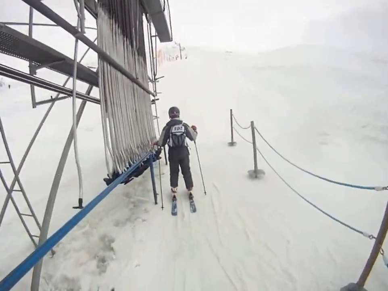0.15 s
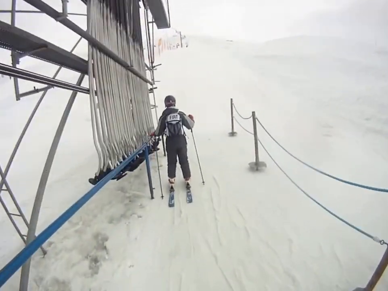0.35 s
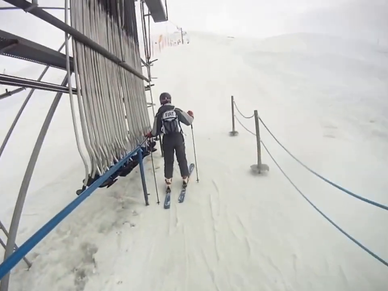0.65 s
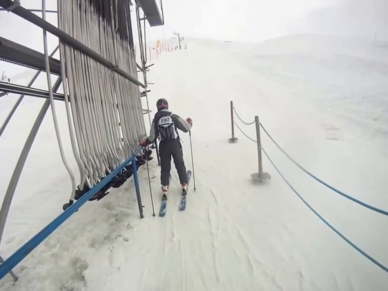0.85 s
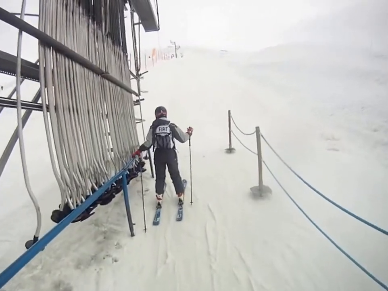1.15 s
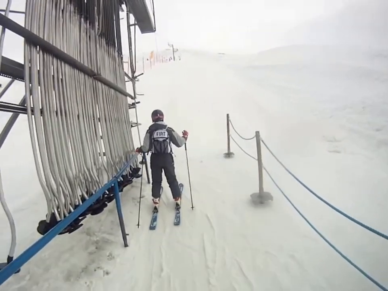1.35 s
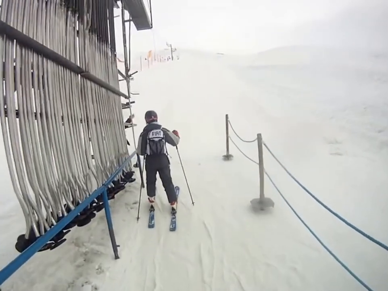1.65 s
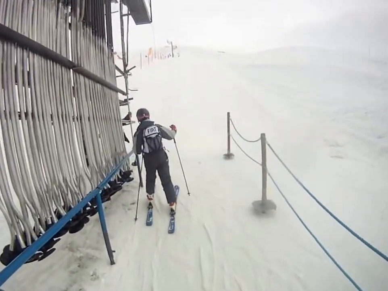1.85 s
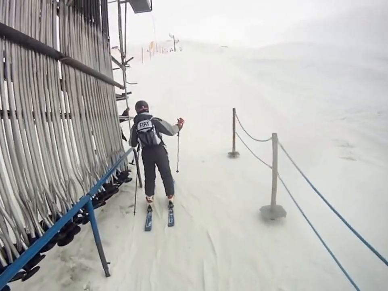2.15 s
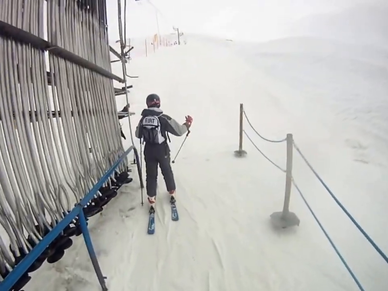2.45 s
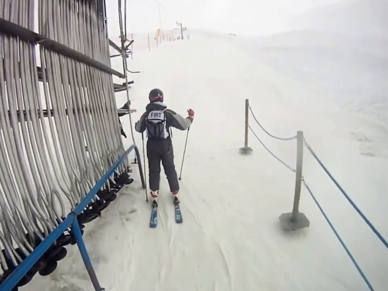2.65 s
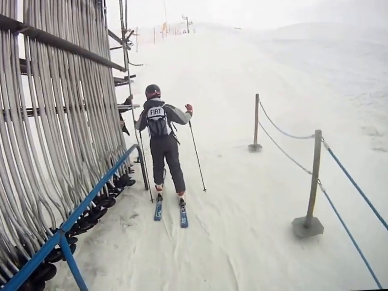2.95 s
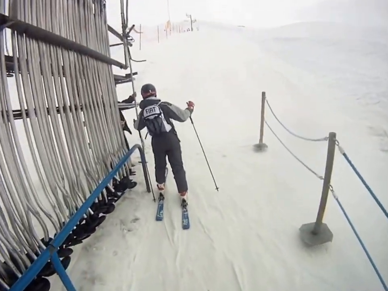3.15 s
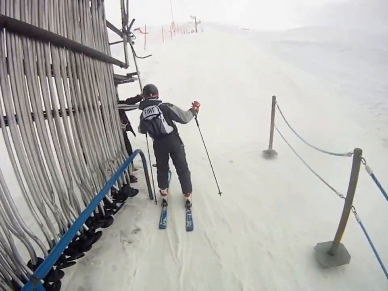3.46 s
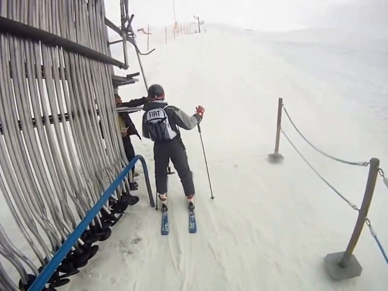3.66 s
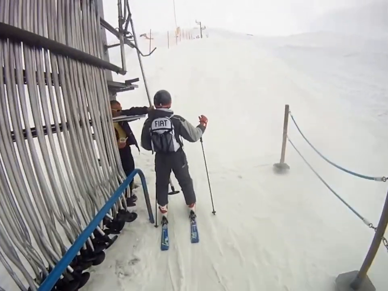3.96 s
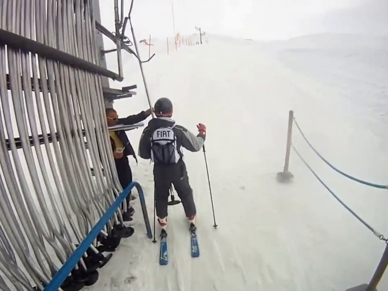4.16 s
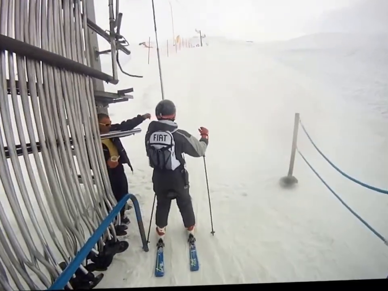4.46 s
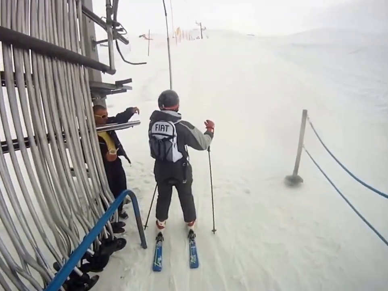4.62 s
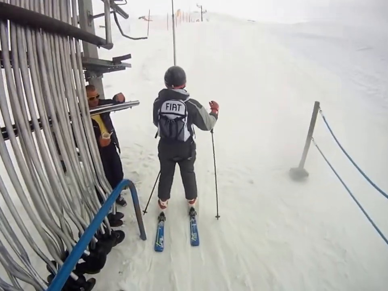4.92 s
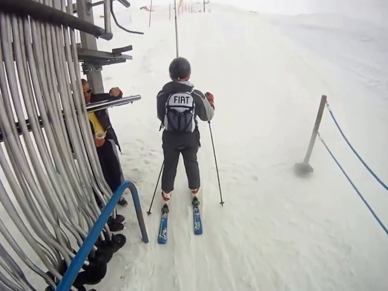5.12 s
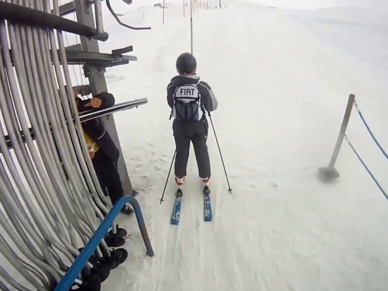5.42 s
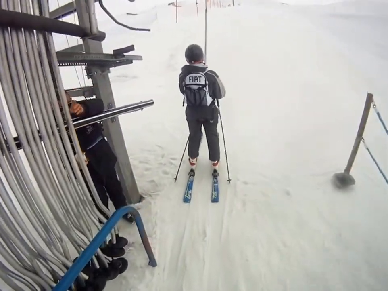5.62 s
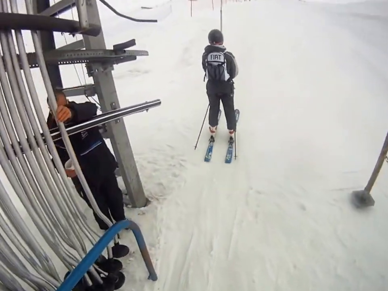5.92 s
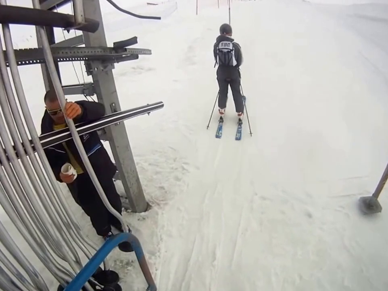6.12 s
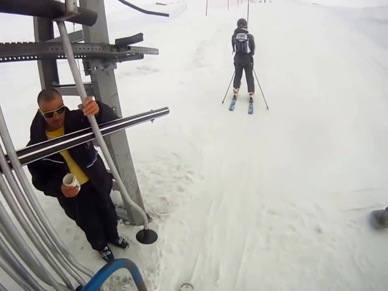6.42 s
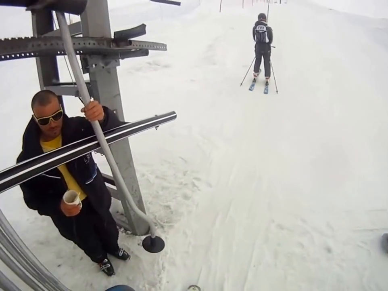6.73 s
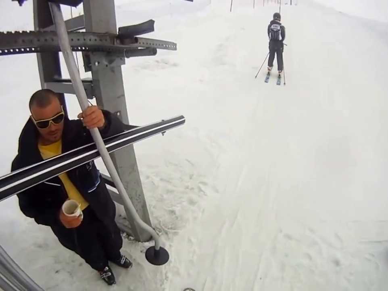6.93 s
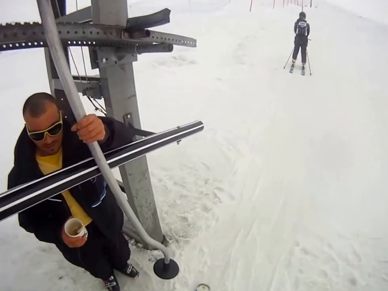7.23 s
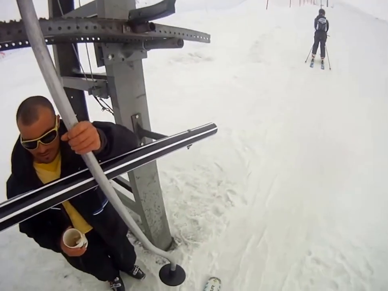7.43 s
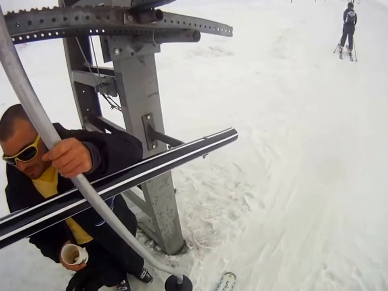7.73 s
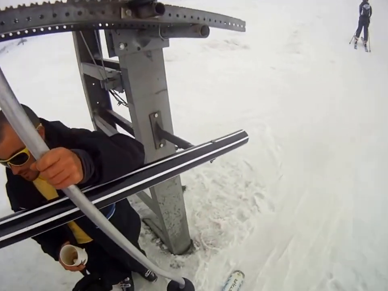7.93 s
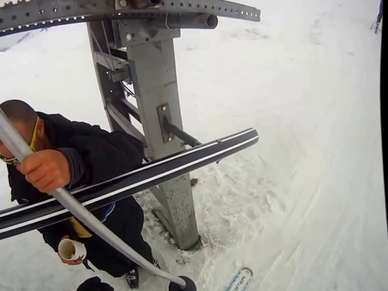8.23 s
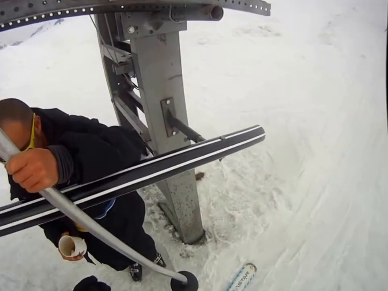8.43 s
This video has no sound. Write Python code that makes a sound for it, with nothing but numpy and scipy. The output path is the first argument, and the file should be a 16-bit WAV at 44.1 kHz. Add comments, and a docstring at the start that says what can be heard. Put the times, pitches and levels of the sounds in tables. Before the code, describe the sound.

Steady gearbox hum and motor rumble of a surface lift, cable whirring, metal poles clacking and scraping, with wind buffeting a sealed microphone.

```python
"""Drag lift drive station

A small microphone in a sealed case glides past the pole rack and hears steady tones from a gearbox.
Filtered noise makes the motor rumble and the wind; noise and clicks make the cable whirr over the sheaves.
Metal poles clack, slide and squeak: noise bursts ring the case, and gliding sines make the squeaks.
One knock hits the case itself. A low sample rate with held values adds mirror images of the spectrum."""
import sys
import numpy as np
from scipy import signal
from scipy.fft import rfft, irfft, next_fast_len
from scipy.io import wavfile

SR = 44100
rng = np.random.default_rng(int(sys.argv[2]) if len(sys.argv) > 2 else 0)


def generate_wav(signal):
    """Clip the signal to [-1, 1] and save it as 16-bit WAV at the path in sys.argv[1]."""
    frames = np.transpose(np.atleast_2d(signal))
    scaled = np.clip(frames, -1, 1) * 32767
    pcm = np.round(scaled).astype(np.int16)
    wavfile.write(sys.argv[1], SR, pcm)


N = 378378   # length [samples]


def from_db(db):
    """Turn decibels into a gain."""
    return 10 ** (np.asarray(db) / 20)


def rms_one(x):
    """Scale a sound to an rms of 1."""
    return x / np.sqrt(np.mean(x ** 2) + 1e-20)


def in_time(rows):
    """Draw straight lines between the rows of a curve, giving each column at every sample."""
    s, *columns = np.transpose(rows)
    return [np.interp(np.arange(N) / SR, s, c) for c in columns]


def drift(rate_hz):
    """Slow random wandering with rms 1: noise smoothed by two equal low-passes, at every 40th sample."""
    r = np.exp(-2 * np.pi * rate_hz * 40 / SR)
    noise = rng.standard_normal(N // 40 + 2002)
    slow = signal.lfilter([1], [1, -2 * r, r * r], noise)[2000:]   # skip the filter's start
    return np.interp(np.arange(N) / 40, np.arange(len(slow)), rms_one(slow))


def coloured(points):
    """Noise with the given spectrum, scaled to an rms of 1."""
    size = next_fast_len(N)
    hz, level_db = np.transpose(points)
    grid = np.maximum(np.arange(size // 2 + 1) * SR / size, 1)
    shape = from_db(np.interp(np.log(grid), np.log(hz), level_db, left=-90, right=-90))
    spectrum = rfft(rng.standard_normal(size)) * shape
    return rms_one(irfft(spectrum, size)[:N])


def resonate(x, modes):
    """Resonances side by side, each applied twice; white noise of rms 1 comes out near rms 1."""
    out, power = 0, 0
    for k, (hz, width, level_db) in enumerate(modes):
        r = np.exp(-np.pi * width / SR)
        b = (1 - r * r) / 2 * np.array([1, 0, -1])
        a = [1, -2 * r * np.cos(2 * np.pi * hz / SR), r * r]
        ring = signal.lfilter(b, a, signal.lfilter(b, a, x))
        out = out + (-1) ** k * from_db(level_db) * ring   # signs alternate, for dark valleys between
        power += from_db(2 * level_db) * np.pi * width / (2 * SR)
    return out / np.sqrt(power)


# loudness of the motor and frame rumble: (time [s], level [dB])
RUMBLE = [(0, -39.5), (.3, -44.5), (1.5, -47.5), (3.5, -48), (5.3, -47), (6.4, -41.5), (7.3, -43.5),
          (7.8, -47.5), (8.58, -46)]
# tone colour of the rumble: (frequency [Hz], relative level per Hz [dB])
FRAME = [(40, -61), (100, 4.5), (130, 3.5), (170, -9), (250, -0.5), (330, 3.5), (380, -8), (550, -15.5),
         (640, -10), (810, -22), (950, -2.5), (1200, -46)]


def rumble():
    """Broad drone of motor and steel frame: coloured noise with a slightly unsteady level."""
    level_db = in_time(RUMBLE)[0] + 0.61 * drift(5.1)
    return from_db(level_db) * coloured(FRAME)


# wind buffeting the case, in gusts with a sheltered lull: (time [s], level [dB])
WIND = [(0, -42.5), (.85, -48), (.95, -37), (1.5, -44), (1.8, -49.5), (2.1, -46), (2.3, -38.5),
        (2.49, -34.5), (2.56, -46), (2.85, -41.5), (3.05, -48), (3.4, -48), (3.5, -37), (4.1, -43.5),
        (4.22, -36.5), (4.5, -49), (4.6, -43.5), (5.2, -44), (5.3, -55), (5.55, -59), (6.6, -63),
        (7.2, -55), (7.5, -54), (7.65, -41), (7.78, -46), (7.9, -37), (8.1, -38), (8.22, -48),
        (8.41, -35.5), (8.58, -47)]
# tone colour of the buffeting: (frequency [Hz], relative level per Hz [dB])
BUFFET = [(8.8, -30), (15, 2.5), (65, 6.5), (129, -2), (193, -12.5), (210, -12), (225, -23), (260, -57),
          (340, -55), (570, -120)]
LUMPS_DB, LUMPS_HZ = 2, 10   # size and speed of the uneven level


def wind():
    """Lumpy low pressure swings on the case: low noise with an uneven level."""
    level_db = in_time(WIND)[0] + LUMPS_DB * drift(LUMPS_HZ)
    return from_db(level_db) * coloured(BUFFET)


SHAFT_HZ = 22.687
# The moving listener passes through loud and dead spots of the gear tones.
# meeting gear teeth, 14 per turn of the shaft: (time [s], level [dB])
MESH = [(0, -38.5), (.7, -41.5), (1.05, -45), (1.28, -59), (1.6, -46.5), (2.15, -43.5), (2.4, -57),
        (2.65, -42), (3.2, -40), (3.9, -47.5), (4.5, -38), (4.95, -43), (5.45, -36), (6.15, -40),
        (6.5, -36), (7.1, -42), (7.6, -37.5), (8.58, -37)]
# tone one shaft turn below the mesh: (time [s], level [dB])
BELOW_MESH = [(0, -54), (.5, -73), (.8, -51), (1.1, -61), (2, -45), (2.6, -61), (3.5, -49), (4.5, -51),
              (4.8, -44), (6, -43), (6.2, -45), (6.4, -50), (8, -54), (8.58, -71)]
# tone at twice the mesh: (time [s], level [dB])
OCTAVE = [(0, -45), (2.6, -50), (3.45, -54.5), (3.75, -59), (4, -53), (4.35, -67), (4.8, -57), (5.1, -65),
          (5.7, -50), (6, -54.5), (6.35, -50.5), (6.8, -55.5), (7.25, -47.5), (7.8, -54.5), (8.58, -50)]
# tone at three times the mesh: (time [s], level [dB])
THIRD = [(0, -62), (.7, -52), (1.05, -70), (1.3, -56), (1.75, -59), (2.15, -49.5), (2.55, -67), (3.15, -52),
         (3.45, -63), (3.75, -55), (4.1, -60), (5.2, -55), (5.45, -48.5), (5.8, -62), (6.1, -48),
         (6.45, -57), (7.6, -55.5), (8.58, -49.5)]
# pitches of these four tones, in the same order: (multiple of shaft speed)
MESH_ORDERS = (14, 13, 28, 42)
# faint tones that come and go by chance: (multiple of shaft speed, mean level [dB], swing [dB])
FAINT_TONES = [(12, -65, 5), (15, -61, 7.5), (27, -66, 6.5)]
# tone of a second wheel: (time [s], level [dB])
SECOND_WHEEL = [(0, -53), (2.4, -66), (2.7, -59), (3.6, -46.5), (7.3, -47), (7.7, -51), (8.58, -50)]
SECOND_WHEEL_HZ, SECOND_WHEEL_WANDER = 222.6, 0.39   # wander of the phase [radians]
# looser tones of the frame:
# (frequency [Hz], phase wander [radians], start level [dB], end level [dB], swing [dB])
FRAME_TONES = [(171.5, 2.6, -51.5, -60, 3.5), (124.6, 2.9, -56, -48.5, 4.5)]


def gearbox():
    """Clean sines locked to the turning shaft, plus looser ones; all waver in level and phase."""
    turn = 2 * np.pi * np.arange(N) / SR   # phase of a 1 Hz tone
    shaft = SHAFT_HZ * turn + 0.044 * drift(0.94)
    mesh_curves = (MESH, BELOW_MESH, OCTAVE, THIRD)
    tones = [(k, in_time(rows)[0]) for k, rows in zip(MESH_ORDERS, mesh_curves)]
    tones += [(k, mean_db + swing_db * drift(0.99)) for k, mean_db, swing_db in FAINT_TONES]
    out = np.zeros(N)
    for k, level_db in tones:
        out += from_db(level_db + 0.86 * drift(3.6)) * np.sin(k * shaft)
    wheel = np.sin(SECOND_WHEEL_HZ * turn + SECOND_WHEEL_WANDER * drift(3.8))
    out += from_db(in_time(SECOND_WHEEL)[0] + 1.2 * drift(11)) * wheel
    for hz, wander, start_db, end_db, swing_db in FRAME_TONES:
        level_db = np.linspace(start_db, end_db, N) + swing_db * drift(3.4)
        out += from_db(level_db) * np.sin(hz * turn + wander * drift(3.93))
    return np.sqrt(2) * out   # the levels are rms values


# one knock on the case itself: (time [s], level [dB])
KNOCK = (7.869, -2)
# ring of the knocked shell: (frequency [Hz], level before the soft onset [dB], time to fall 60 dB [s])
KNOCK_MODES = [(528, -21.5, 0.052), (798, -9.5, 0.047), (1211.4, -2, 0.024), (1433, -5, 0.026),
               (1690, -5, 0.02), (2020, 0.5, 0.015), (2430, -5.5, 0.013), (3480, -16, 0.016)]


def knock():
    """A short soft contact rings the shell: a handful of sines that start together and die quickly."""
    after, out = np.arange(SR // 10) / SR, np.zeros(N)
    ring = np.zeros(len(after))
    for hz, level_db, t60 in KNOCK_MODES:
        ring += from_db(level_db - 60 * after / t60) * np.sin(2 * np.pi * hz * after)
    soft_onset = 1 - np.exp(-after / 0.003)
    at = round(KNOCK[0] * SR)
    out[at:at + len(after)] = from_db(KNOCK[1]) * ring * soft_onset
    return out


# metal squeaks as a pole rubs:
# (start [s], end [s], start pitch [Hz], end pitch [Hz], level [dB], roughness [dB])
SQUEAKS = [(0.24, 0.312, 4500, 4730, -45, 3), (0.43, 0.508, 4570, 4580, -27, -2),
           (0.503, 0.53, 4360, 4350, -32, -2), (6.606, 6.644, 5030, 4900, -48, 9.5),
           (6.637, 6.748, 4930, 4800, -43, 3.5)]
SQUEAK_WOBBLE = .3   # phase wobble [radians per dB of roughness]


def squeaks():
    """Gliding tones whose level and phase flutter with the grip."""
    out, flutter, wobble = np.zeros(N), drift(70), drift(140)
    for start, end, start_hz, end_hz, level_db, rough_db in SQUEAKS:
        at = np.arange(round(start * SR), round(end * SR))
        phase = 2 * np.pi * np.cumsum(np.linspace(start_hz, end_hz, len(at))) / SR
        phase += SQUEAK_WOBBLE * rough_db * wobble[at]
        fade = signal.windows.tukey(len(at), .4)
        out[at] += from_db(level_db + rough_db * flutter[at]) * fade * np.sin(phase)
    return out


def zone_gains(level_db, *zone_db):
    """Strength of a contact in the body zone, then in the other zones in dB against it."""
    return from_db(level_db + np.array([0, *zone_db])[:, None])


# cable whirr in the body zone as the listener glides along the rack: (time [s], level [dB])
WHIRR = [(0, -41), (.3, -45), (.75, -45), (1.3, -48.5), (2.05, -51.5), (2.5, -46.5), (3.1, -50.5),
         (3.5, -50), (3.75, -47), (4.2, -46.5), (4.4, -49.5), (5, -49.5), (5.5, -45.5), (5.9, -47.5),
         (6.5, -45), (7.3, -48), (8.58, -48.5)]
# whirr in the low body, upper ring and jingle zones: (mean level [dB], share of the body's swing in dB)
WHIRR_ZONES = [(-49.5, 0.85), (-58, 0.86), (-57, 0.82)]
GRAINS_PER_S, CLATTER_SHARE = 900, 0.17   # clicks per second, and their share of the power


def whirr():
    """Cable running over the sheaves: steady hiss mixed with random clicks, set for each of four zones."""
    body_db, = in_time(WHIRR)
    swing_db = body_db - body_db.mean()
    levels_db = [body_db] + [mean_db + share * swing_db for mean_db, share in WHIRR_ZONES]
    sizes = from_db(4.0 * np.minimum(rng.exponential(1, N), 5)) * rng.choice([-1, 1], N)
    grains = rms_one(sizes * (rng.random(N) < GRAINS_PER_S / SR))
    hiss = rng.standard_normal(N)
    mix = np.sqrt(1 - CLATTER_SHARE) * hiss + np.sqrt(CLATTER_SHARE) * grains
    return mix * from_db(levels_db)


# poles sliding along the rail: (start [s], loudest [s], end [s], body level [dB],
# low body against the body [dB], jingle against the body [dB])
SLIDES = [(0.348, 0.475, 0.71, -41, 4.5, 3), (2.196, 2.23, 2.3, -48, 0, -6),
          (3.854, 3.963, 4.15, -46.5, -3, -3), (5.096, 5.162, 5.23, -44, 4.5, -12),
          (5.16, 5.295, 5.36, -33.5, -2, -22), (5.283, 5.364, 5.55, -44, 1.5, -10),
          (6.03, 6.114, 6.2, -35, -6.5, -11), (6.095, 6.194, 6.4, -33, -5.5, -17.5),
          (6.533, 6.63, 6.76, -42.5, -9, -16), (6.744, 6.887, 7.22, -41, -3.5, -20),
          (7.424, 7.503, 7.74, -34.5, -5, -9)]
# upper ring in a slide: level against the body [dB], plus this share of the jingle's dB
UPPER_DB, UPPER_FOLLOWS = -5.5, 0.56


def slides():
    """Poles scraping along the rail: noise, roughened by stick and slip, swells and fades in four zones."""
    drive = np.zeros((4, N))   # body, low body, upper ring, jingle
    scrape = rng.standard_normal(N) * from_db(1.84 * drift(60))
    for start, loudest, end, body_db, low_db, jingle_db in SLIDES:
        swell = np.interp(np.arange(N) / SR, [start, loudest, end], [0, 1, 0])
        upper_db = UPPER_DB + UPPER_FOLLOWS * jingle_db
        drive += zone_gains(body_db, low_db, upper_db, jingle_db) * swell * scrape
    return drive


# pole blows: (time [s], peak of the crack in the body zone [dB], then against the body: thud [dB],
# low body [dB], upper ring [dB], jingle [dB]; last the chatter's drive, before its envelope [dB])
CLACKS = [(.216, -31.5, -15, -8, -5, -5.5, -12), (.2547, -26.5, -14, -6.5, -10, -4, -11.5),
          (.3428, -18.5, -16, -11, -8.5, -1.5, -12), (.4067, -25.5, -30, -24, -9, 7, -21),
          (.4193, -7.5, -30, -22, 0.5, -2, -26), (.4236, -14.5, -37, -1.5, -2.5, 2.5, -7.5),
          (.4485, -22, -20, 4.5, -8, 7, -7), (.4632, -21, -20, 7, -9, -3, -22),
          (.4889, -17, -20, -2.5, -1.5, 3.5, -10), (.5064, -22, -25, -1, -14, -2, -14.5),
          (.6329, -39, -10, 8.5, -6, 4, -11.5), (1.3285, -36.5, -7, -7, -5.5, -8, -20),
          (2.1934, -15.5, -38, -13, -7.5, -8, -15.5), (2.223, -30, -12, 5.5, -4, 3, -16),
          (2.5401, -40, -20, -19, -11, -10, -6), (3.8503, -25, -14, -7.5, -3, -1.5, -12.5),
          (3.9008, -31, -7, -5, -6, -3, -14), (4.1238, -34.5, -13, -12, -25, -10, -8),
          (4.1984, -40, -26, -17, -18, 1, -11), (4.3494, -47.5, -18, -8, -2, 8.5, -10),
          (4.5994, -48, -10, -4, 2, 2, -18), (5.2773, -33, -28, -15, -37, -29, -5),
          (5.2956, -33, -14, -1, -22, -12, -6.5), (6.0103, -23, -14, -16, -7.5, -11.5, -4.5),
          (6.0197, -20, -5, -8.5, -9.5, -15, -4), (6.0855, -30.5, -4, -8, -14, -7.5, 2),
          (6.1275, -26, -5, -10, -20, -19, -13), (6.1554, -26, -5.5, -16, -16, -18, -11),
          (6.1724, -25.5, -6, -20, -6.5, -21, -5.5), (6.6586, -22.5, -31, -11, -10, -13, -22),
          (6.7814, -37, -5, -10, -4.5, -17, -9), (7.4291, -22.5, -18, -11, -9, -12, -10.5),
          (7.4404, -29, -12, 0.5, -7, -7, 1), (7.4816, -0.5, -33, -9, -7, -14.5, -19.5),
          (7.5158, -26, -16, -6, -9, -5, -3)]
CRACK_S, CHATTER_T60_S = .002, 0.26   # time scale of the crack; time for the chatter to fall 60 dB


def clacks():
    """Pole blows: a noise crack swells and dies within milliseconds, then the pole chatters out."""
    drive = np.zeros((5, N))   # body, low body, upper ring, jingle, thud
    bounces = from_db(2.2 * drift(77))   # loose parts rebound unevenly
    after = np.arange(SR // 3) / SR
    swing = after / CRACK_S
    hump = (swing / 2 * np.exp(1 - swing / 2)) ** 2
    tail = (1 - np.exp(-swing / 2)) * from_db(-60 * after / CHATTER_T60_S)
    for s, peak_db, thud_db, *zone_db, chatter_db in CLACKS:
        noise = rng.standard_normal(len(after))
        at = round((s - .003) * SR)   # the burst starts 3 ms ahead of its row
        span = slice(at, at + len(after))
        crack = noise * hump
        # evened out, so that the crack rings the body up to the peak of the row
        crack = crack / np.abs(resonate(crack[:SR // 40], BODY_MODES)).max()
        burst = crack + from_db(chatter_db) * noise * tail * bounces[span]
        drive[:, span] += zone_gains(peak_db, *zone_db, thud_db) * burst
    return drive


# resonances of the case, one table a zone: (frequency [Hz], width [Hz], relative level [dB])
BODY_MODES = [(1561, 132, -5), (1846, 230, 3), (2080, 302, -1.5), (2280, 497, -7)]
LOW_MODES = [(1114, 290, -0.32), (1306, 250, -1.7)]
UPPER_MODES = [(2863, 1380, -8), (3552, 440, 3), (4010, 340, -8.5)]
JINGLE_MODES = [(4240, 105, -15), (4655, 330, -7), (4910, 156, -3), (5223, 434, -3), (5595, 1150, -18)]
THUD_MODES = [(180, 40, -1), (340, 107, 4), (491, 64, -8), (560, 73, -8.5), (828, 240, -5)]


def poles():
    """Whirr, slides and blows make the case ring, each zone of resonances with its own strength."""
    drive = clacks()
    drive[:4] += whirr() + slides()   # these two leave the thud zone alone
    zones = BODY_MODES, LOW_MODES, UPPER_MODES, JINGLE_MODES, THUD_MODES
    # the tiny offset keeps the filters away from extremely small numbers
    return sum(resonate(x + 1e-18, modes) for x, modes in zip(drive, zones))


def scene():
    """All sources added at the microphone."""
    return (rumble() + wind() + gearbox() + knock() + squeaks() + poles())[None]


LIMIT_DB, RELEASE_DB_PER_S = -2.5, 66


def limiter(x):
    """Peaks over the limit pull the gain down; it climbs back at a steady rate, slightly smoothed."""
    ramp = RELEASE_DB_PER_S * np.arange(N) / SR
    over_db = np.maximum(20 * np.log10(np.abs(x) + 1e-9) - LIMIT_DB, 0)
    held_db = np.maximum.accumulate(over_db + ramp, axis=1) - ramp
    lag = np.exp(-1 / (0.0083 * SR))   # smoothing over 8.3 ms
    return x * from_db(-signal.lfilter([1 - lag], [1, -lag], held_db))


HELD_HZ, OUT_HZ = 12000, 48000   # low sample rate, and the rate at which its values are repeated
CUTOFF_HZ = 15350


def record(dry):
    """Limited, sampled at a low rate, peaks rounded, each value held four steps, top cut."""
    low = signal.resample_poly(limiter(dry), HELD_HZ // 300, SR // 300, axis=1)
    rounded = low / (1 + (low / .9) ** 4) ** .25
    held = np.repeat(rounded, OUT_HZ // HELD_HZ, axis=1)   # holding mirrors the spectrum
    out = signal.resample_poly(held, SR // 300, OUT_HZ // 300, axis=1)[:, :N]
    out = np.pad(out, ((0, 0), (0, N - out.shape[1])))
    top_cut = signal.ellip(14, .2, 90, CUTOFF_HZ, fs=SR, output="sos")
    return signal.sosfilt(top_cut, out)


dry = scene()
out = record(dry)
generate_wav(out)
```